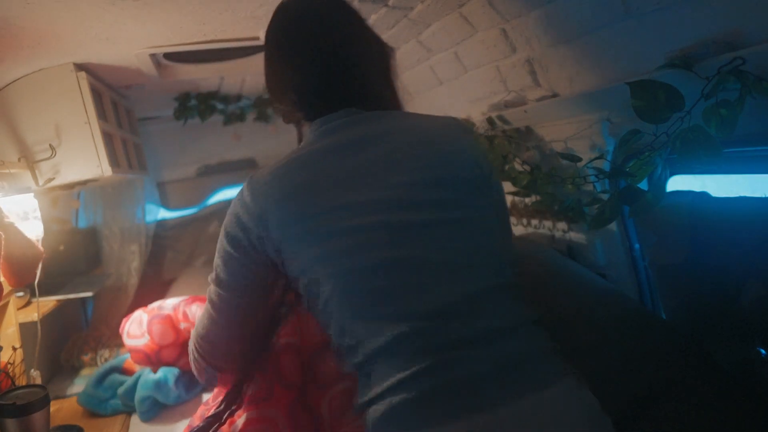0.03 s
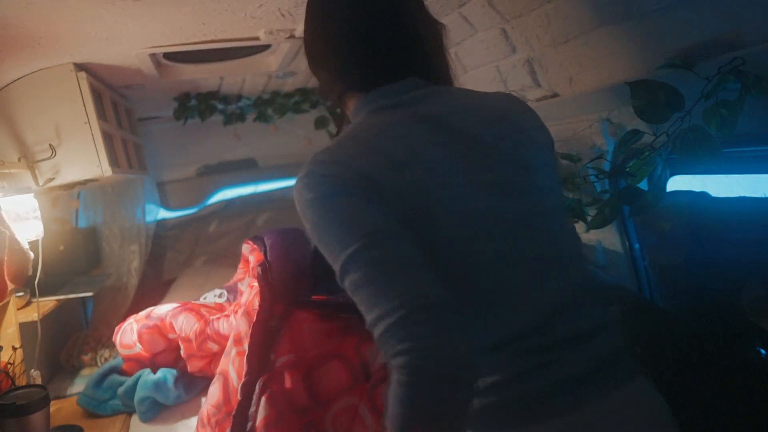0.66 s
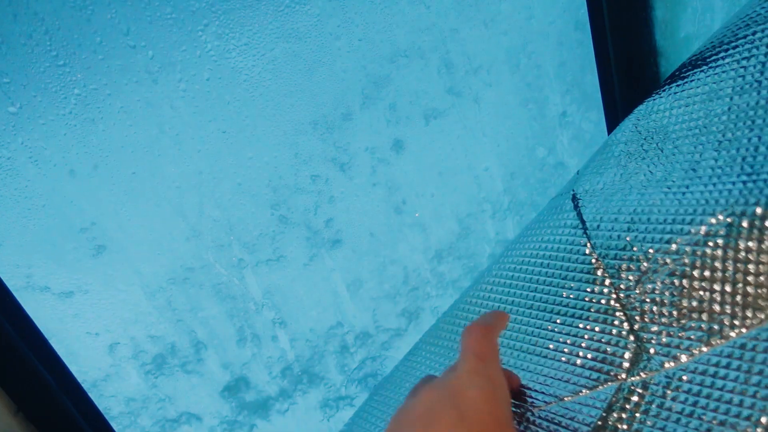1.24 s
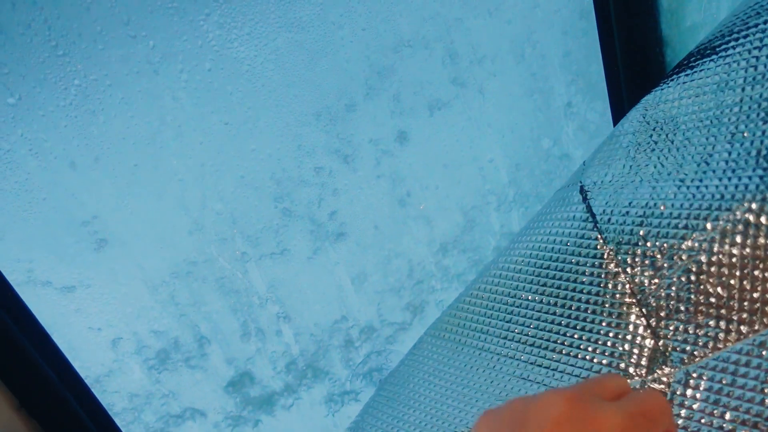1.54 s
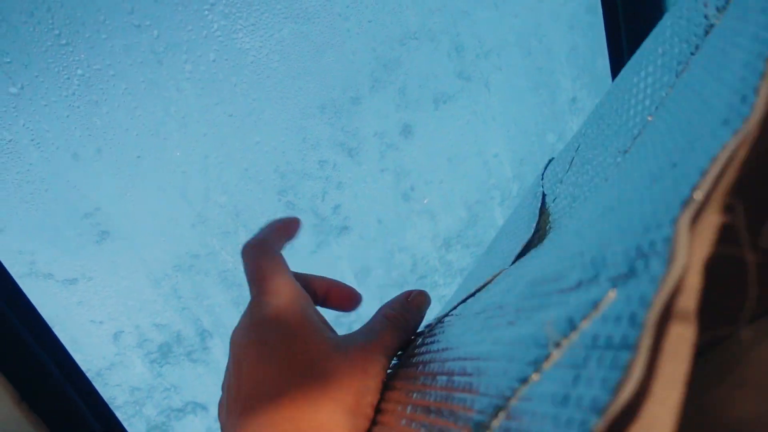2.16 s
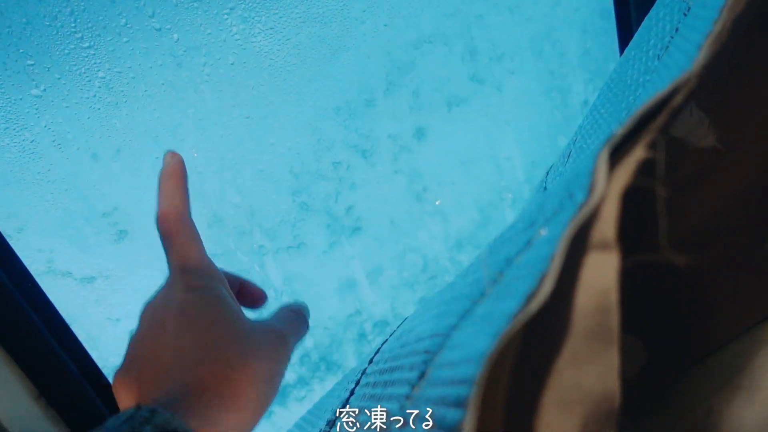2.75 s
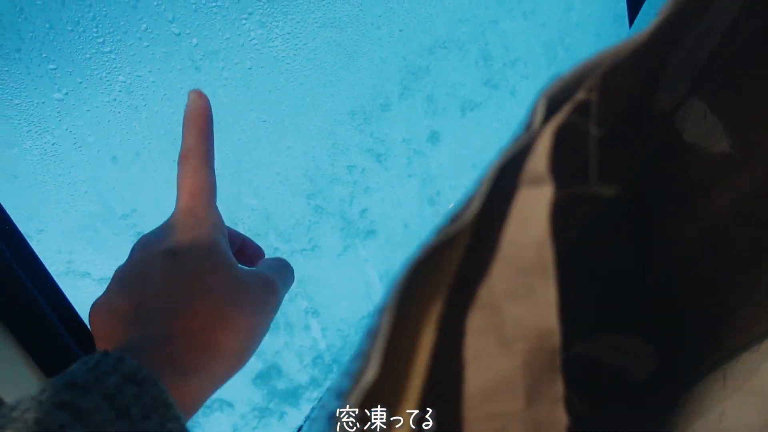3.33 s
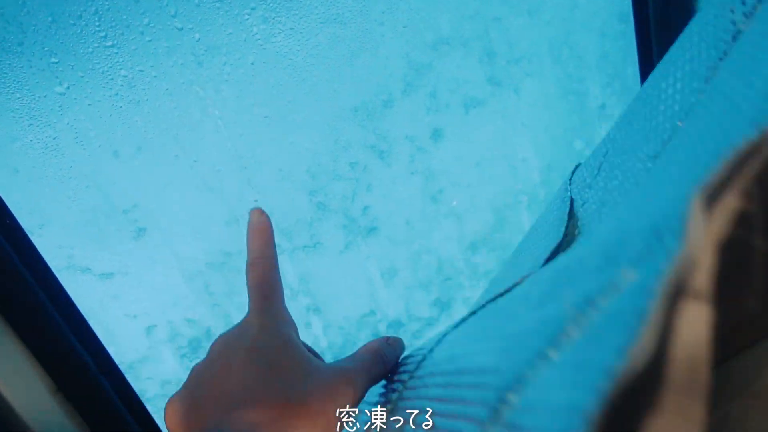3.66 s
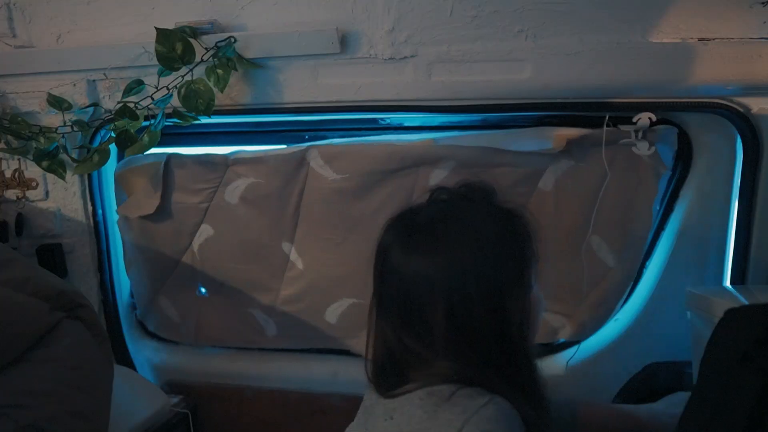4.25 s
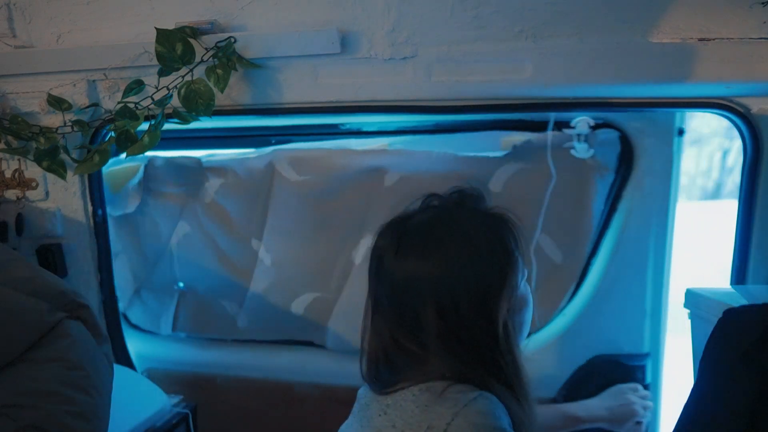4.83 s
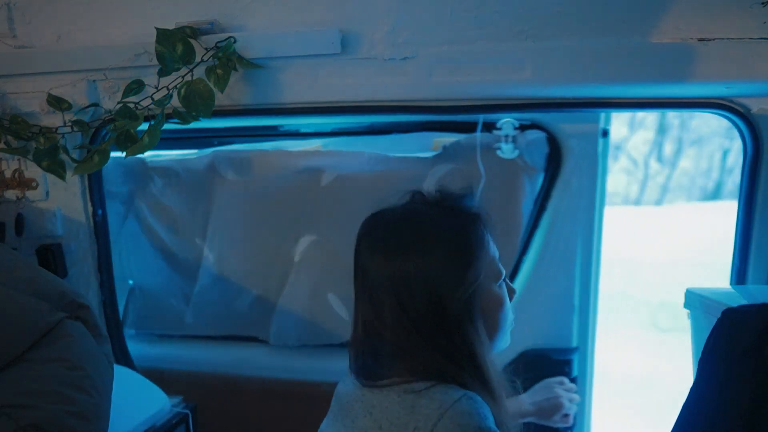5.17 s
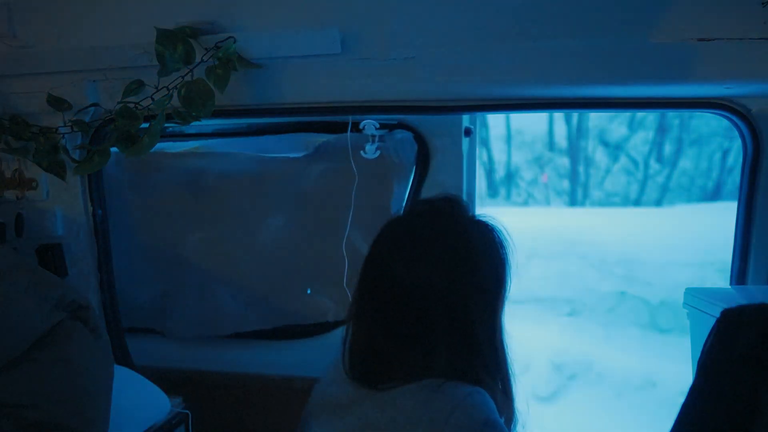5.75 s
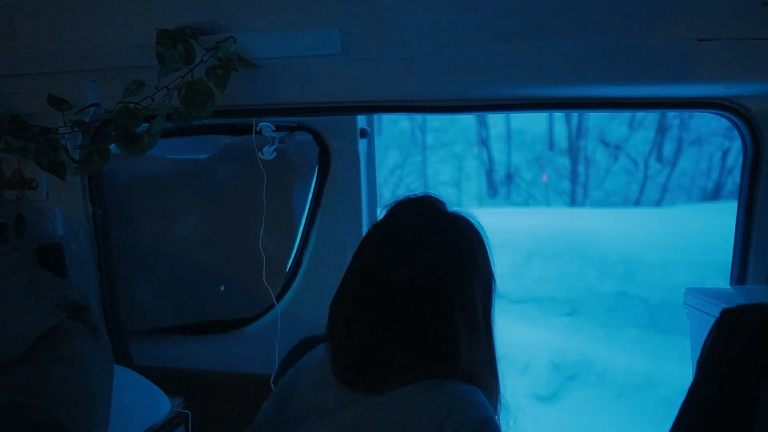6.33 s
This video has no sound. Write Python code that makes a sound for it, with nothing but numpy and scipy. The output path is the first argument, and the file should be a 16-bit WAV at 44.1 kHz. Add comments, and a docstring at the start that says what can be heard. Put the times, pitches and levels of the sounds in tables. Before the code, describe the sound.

A nylon sleeping bag swishes softly, with a few small knocks on a bed frame. A foil sunshade crinkles and snaps as it is peeled back. A fingernail then scrapes frost off a window in short, gritty strokes, cracking off bits of ice. The scraping cuts off and a sliding door rolls open with quick clacks and a low rumble. Everything sounds close, inside a small, quiet van.

```python
"""Inside a parked van on a frozen morning. A nylon sleeping bag swishes aside and the bed frame knocks, then a
foil sunshade crackles as it is peeled back. A fingernail scrapes frost off the side window; then the scene
changes and the sliding door rolls open, clacking, and the whole body rumbles. Every friction sound is a stream
of tiny slips that rings the thing being rubbed; the small cabin adds a short echo."""
import sys
import numpy as np
from scipy import signal
from scipy.fft import rfft, irfft
from scipy.io import wavfile
from scipy.ndimage import uniform_filter1d

SR = 44100
rng = np.random.default_rng(int(sys.argv[2]) if len(sys.argv) > 2 else 0)


def master(y):
    """Save y as 16-bit WAV."""
    cut = np.clip(np.atleast_2d(y).T, -1, 1)
    pcm = np.round(cut * 32767)  # scale
    wavfile.write(sys.argv[1], SR, pcm.astype(np.int16))


N = 286650
TIME = np.arange(N) / SR
FREQ = np.maximum(np.arange(N // 2 + 1) * SR / N, 1)
DOOR_START_S, DOOR_FADE_S = 4.187, 0.0029  # the scene changes: the scraping stops dead and the door begins


def sliding_door():
    """Rollers run along a gritty track and ring the body; the mechanism clacks over a steady hiss."""
    # the door's travel, as faders for its three bands: time_s, roll_db, rumble_db, hiss_db
    travel = [(4.2, -45, -40, -54), (4.33, -48, -45.5, -55.5), (4.55, -50, -33, -53),
              (4.74, -43, -30, -52.5), (4.9, -29.5, -24, -48), (5.13, -27, -25, -43.5),
              (5.28, -23, -25, -40.5), (5.7, -26.5, -24.5, -41), (6.06, -29, -28.5, -44),
              (6.5, -33, -26, -48)]
    # tone of the track: frequency_hz, gain_db
    track = [(15, -14), (55, 5.5), (150, 3.5), (270, -7), (520, -14.5), (1600, -19.5), (2500, -25),
             (4000, -34), (5600, -35), (7200, -44), (9000, -42.5), (16000, -59.5)]
    # resonances of the van's body: pitch_hz, width_hz, boost_db
    panels = [(137, 30, -2), (223, 17, -0.5), (335, 57, 4), (672, 170, 3)]
    # the rollers jolt over joints in the track: start_s, level_db
    joints = [(4.879, -11), (5.078, -7)]
    # the latch lets go, then the mechanism clacks ever faster: start_s, level_db, ring_hz
    latch_hits = [(4.6638, -23, 2640), (4.7516, -34, 2000), (4.8179, -29.5, 2200), (4.8764, -23, 2960),
                  (4.9307, -24, 4330), (4.9804, -26, 8550), (5.029, -24.5, 2310), (5.0764, -31, 2900),
                  (5.1138, -25.5, 3430), (5.1532, -21, 5530)]
    # tone of the mechanism: frequency_hz, gain_db
    latch_tone = [(300, -10), (1400, 4.5), (1900, 4), (4500, -5.5), (9000, -14), (11000, -16), (15500, -22)]
    times, *faders_db = np.transpose(travel)
    moving = np.clip((TIME - DOOR_START_S) / DOOR_FADE_S, 0, 1)
    roll, rumble, hiss = (moving * undb(np.interp(TIME, times, db)) for db in faders_db)
    grit = slips(per_s=2500, spread_db=5, smooth=1) * undb(0.94 * wander(35))
    rolling = stroke(ring(grit, track, panels), (rumble, roll, hiss), bass_hz=246, treble_hz=2035)
    jolts = highpass(ring(bursts(joints, decay_s=0.012), track, panels), hz=390, order=2)
    latch = clacks(latch_hits, latch_tone, decay_s=0.0075, rise_s=0.003, ring_db=8, ring_share=0.2)
    steady_hiss = undb(-58) * moving * rng.standard_normal(N)
    sound = rolling + jolts + latch + steady_hiss
    return panel_hum() + cabin(sound, wet_db=-8.5, t60_s=0.054, wide_db=-2, wide_hz=1510)


def panel_hum():
    """The rollers hold body panels in vibration; each hum sags at both ends with the door's speed."""
    # panels shudder as the door runs: start_s, end_s, pitch_hz, sag_hz, level_db
    hums = [(4.193, 4.31, 38.1, 3, -32.5), (4.718, 4.926, 139, 3, -24), (4.876, 5.001, 215.5, 3, -24.5),
            (4.912, 5.23, 152.4, 7, -25.5), (5.161, 5.652, 335.2, 26, -26.5), (5.22, 5.466, 133.1, 2, -25),
            (5.378, 5.58, 214.7, 2, -27), (5.517, 5.68, 117.2, 3, -28), (6.1, 6.39, 214.5, 2, -27),
            (6.18, 6.65, 141, 3, -27.5)]
    fade_s, arch_db, waver_rad = 0.028, 3.5, 0.34
    out = np.zeros(N)
    for start, end, hz, sag_hz, db in hums:
        off_centre = np.abs(np.interp(TIME, [start, end], [-1, 1]))
        held = np.clip(np.minimum(TIME - start, end - TIME) / fade_s, 0, 1)
        phase = 2 * np.pi * np.cumsum(hz - sag_hz * off_centre ** 2) / SR + waver_rad * wander(18)
        out += held * undb(db - arch_db * off_centre) * unit(np.sin(phase))
    return out


def frost_scrape():
    """The nail sticks and slips over ice crystals, ringing the pane and cracking off brittle grains."""
    # strokes of the nail: start_s, peak_s, end_s, level_db, bass_offset_db, treble_offset_db
    nail = [(2.617, 2.625, 2.696, -48, 3.5, -7.5), (2.755, 2.88, 3.003, -31, -6.5, -15),
            (2.797, 2.9, 2.954, -25.5, -30, -8.5), (3.068, 3.097, 3.14, -35.5, 2.5, -18.5),
            (3.118, 3.22, 3.4, -25, -10, -12.5), (3.185, 3.21, 3.33, -31, 1.5, -27),
            (3.452, 3.62, 3.725, -33.5, -10, -7.5), (3.735, 3.76, 3.82, -33, -3.5, -14),
            (4.079, 4.09, 4.17, -38.5, -4, -9.5), (4.158, 4.172, 4.4, -32.5, 0.5, -3)]
    # tone of the frosted window: frequency_hz, gain_db
    frost = [(70, -53), (115, -17.5), (170, -1), (300, -7), (640, -11.5), (1000, -7), (1780, -10),
             (2300, -18), (5000, -20.5), (8500, -28), (10500, -37), (16000, -50)]
    # resonances of the glass: pitch_hz, width_hz, boost_db
    pane = [(180, 38, 0.5), (431, 72, 9), (513, 11, 6), (858, 84, 9.5), (1278, 61, 9), (1600, 80, -2),
            (2890, 125, 9.5), (3215, 110, 9.5), (3560, 70, -2), (4620, 130, 1.5), (5330, 150, 4)]
    # the nail catches and a larger chip breaks off: start_s, level_db
    catches = [(2.7128, -26), (2.7245, -27.5), (2.7545, -26), (2.7782, -24.5), (2.7971, -17), (2.8125, -16),
               (2.8458, -26), (2.8595, -14), (2.867, -13.5), (2.8912, -17.5), (2.905, -22), (2.9223, -13.5),
               (2.934, -13), (3.1195, -21), (3.1937, -20), (3.226, -20), (3.5025, -28), (3.5484, -20.5),
               (3.6407, -25), (3.6527, -15), (3.7475, -20.5), (4.127, -30), (4.1664, -14.5)]
    # the nail skids hard on bare glass: peak_s, pitch_hz, width_hz, level_db, length_s
    skid = [(4.177, 1560, 1080, -24.5, 0.009)]
    release = stick_slip(per_s=105, depth_db=15, curve=0.68)
    grit = slips(per_s=3000, spread_db=1, smooth=0.46) * release * undb(wander(170))
    age = TIME[:SR // 50]
    grain = rng.standard_normal(len(age)) * np.exp(-age / 0.0022)
    crystals = signal.oaconvolve(slips(per_s=300, spread_db=1.5, smooth=0.1) * release, grain)[:N]
    bass, middle, treble = gestures(nail, arch_db=7, attack_s=0.0032, release_s=0.011,
                                    linger_db=-23, linger_s=0.15)
    scrape = stroke(ring(grit, frost, pane), (bass, middle, treble), bass_hz=330, treble_hz=2230)
    crackle = undb(-2.5) * treble * unit(highpass(ring(crystals, frost), hz=2170, order=3))
    # chips are too light to flex the glass much
    chips = highpass(ring(bursts(catches, decay_s=0.006), frost, pane), hz=790, order=1)
    scrape_cutoff = np.clip(1 + (DOOR_START_S - TIME) / DOOR_FADE_S, 0, 1)
    sound = scrape_cutoff * (scrape + crackle + chips + swells(skid))
    return cabin(sound, wet_db=-4.5, t60_s=0.044, wide_db=-6.5, wide_hz=2520)


def sunshade():
    """Quilted foil crackles as it bends; creases snap and the padding thuds under the hand."""
    # the shade is bent or brushed: start_s, peak_s, end_s, level_db, bass_offset_db, treble_offset_db
    bends = [(1.29, 1.35, 1.47, -57.5, -8.5, 3), (1.485, 1.52, 1.637, -50.5, 1.5, 4),
             (1.585, 1.645, 1.704, -40.5, -1.5, 0.5), (1.72, 1.8, 1.82, -56, -12, 6.5),
             (1.885, 1.945, 1.99, -52.5, 4.5, 4.5), (1.975, 2.03, 2.091, -42.5, -8, 1),
             (2.12, 2.19, 2.25, -51, -11, 2.5), (3.78, 3.83, 3.92, -61, 4, 4.5)]
    # tone of the foil: frequency_hz, gain_db
    foil = [(50, -39), (150, 7.5), (450, 6.5), (720, -2), (1350, 0.5), (2300, -5), (3900, -7), (5400, -8),
            (7000, -8.5), (12000, -16.5), (16000, -27)]
    # the sheet resounds as it buckles: peak_s, pitch_hz, width_hz, level_db, length_s
    buckles = [(1.225, 1280, 180, -48.5, 0.031), (1.63, 420, 253, -37, 0.033),
               (1.642, 1220, 433, -30.5, 0.018), (2.0, 5450, 900, -44, 0.028)]
    # the sharpest creases snap: start_s, level_db, ring_hz
    creases = [(1.199, -31, 4960), (1.3836, -41, 7000), (1.4719, -32, 7160), (1.5029, -33, 5030),
               (1.5957, -30, 5370), (1.7962, -35, 5100), (1.9174, -31.5, 5030), (1.9703, -25, 5450),
               (1.9803, -24, 5500), (2.0382, -26.5, 6760), (2.1928, -30.5, 3660), (2.2033, -29, 10600),
               (2.2445, -34, 9050)]
    # tone of a snap: frequency_hz, gain_db
    snap_tone = [(400, -1), (1400, -3), (5500, 3), (15000, -1)]
    # the hand bumps the shade: start_s, level_db
    bumps = [(1.67, -28), (2.041, -27.5)]
    # dull tone of the padding: frequency_hz, gain_db
    padding = [(40, -27), (160, -0.5), (260, -6), (450, -9), (1000, -48)]
    grit = slips(per_s=6000, spread_db=5, smooth=1.34) * stick_slip(per_s=80, depth_db=10, curve=0.83)
    gains = gestures(bends, arch_db=4, attack_s=0.024, release_s=0.018, linger_db=-9.5, linger_s=0.13)
    crinkle = stroke(ring(grit, foil), gains, bass_hz=590, treble_hz=3240)
    snaps = clacks(creases, snap_tone, decay_s=0.0026, rise_s=0.00027, ring_db=7.5, ring_share=0.34)
    sound = crinkle + swells(buckles) + snaps + ring(bursts(bumps, decay_s=0.0069), padding)
    return cabin(sound, wet_db=-11, t60_s=0.1, wide_db=-6.5, wide_hz=1800)


def sleeping_bag():
    """Nylon slides over nylon in a fine hiss, sings where it is taut, and the bed frame knocks."""
    # pushes on the bag: start_s, peak_s, end_s, level_db, bass_offset_db, treble_offset_db
    pushes = [(-.02, .14, 0.78, -47.5, -5, -3.5), (.32, .39, 0.48, -42.5, -6, 1.5),
              (.42, .53, 0.66, -42, -16, -2), (.78, .82, 0.89, -52.5, -5, -8),
              (.91, .98, 1.074, -40.5, -10, -3), (1.08, 1.2, 1.265, -47, -9.5, -2)]
    # tone of the nylon: frequency_hz, gain_db
    nylon = [(20, -11), (60, -2.5), (210, -3), (430, -7.5), (700, -0.5), (1800, 1), (3500, -7.5),
             (10000, -15), (16000, -21)]
    # the taut weave sings as it slides: peak_s, pitch_hz, width_hz, level_db, length_s
    weave = [(.52, 730, 400, -43.5, 0.063), (1.02, 850, 300, -44, 0.064)]
    # small knocks on the bed frame: start_s, level_db
    knocks = [(.056, -41.5), (.104, -39), (.751, -32.5), (.786, -39), (.873, -26), (.902, -33),
              (1.181, -38.5)]
    # tone of the frame: frequency_hz, gain_db
    frame = [(70, -17), (200, 5), (430, -11.5), (750, 3), (4800, -7), (6500, -15.5), (16000, -19)]
    friction = slips(per_s=6000, spread_db=4.5, smooth=1.07) * undb(1.2 * wander(59.84))
    gains = gestures(pushes, arch_db=7, attack_s=0.0093, release_s=0.026, linger_db=-15, linger_s=0.12)
    swish = stroke(ring(friction, nylon), gains, bass_hz=420, treble_hz=3260)
    sound = swish + swells(weave) + ring(bursts(knocks, decay_s=0.011), frame)
    return cabin(sound, wet_db=-6, t60_s=0.038, wide_db=-0.5, wide_hz=1190)


def still_air():
    """A faint hush with a low drone fills the van."""
    # tone of the hush: frequency_hz, gain_db
    room_tone = [(30, -36), (180, 3), (7000, -17), (16000, -36)]
    hush = ring(rng.standard_normal(N), room_tone)
    band = signal.butter(2, [56, 80], "band", fs=SR, output="sos")
    drone = unit(signal.sosfilt(band, rng.standard_normal(N)))
    return cabin(undb(-68) * (hush + drone), wet_db=-36, t60_s=0.17, wide_db=8.5, wide_hz=686)


def cabin(x, wet_db, t60_s, wide_db, wide_hz):
    """Short reflections off the near walls; the treble spreads wide, the deep bass stays centred."""
    age = TIME[:SR // 4]
    tails = rng.standard_normal((2, len(age))) * np.exp(-np.log(1000) * age / t60_s) * (age > 0.001)
    paths = (signal.oaconvolve(x, tail / np.sqrt(np.sum(tail ** 2)))[:N] for tail in tails)
    # the source moves about, so the phase of the reflections keeps changing
    echo, side = (np.real(signal.hilbert(path) * np.exp(2j * wander(10))) for path in paths)
    mid = (x + undb(wet_db) * echo) / np.hypot(1, undb(wet_db))
    width = FREQ / (FREQ + wide_hz) / (1 + (150 / FREQ) ** 4)
    side = undb(wide_db) * irfft(rfft(side) * width, N)
    return np.array([mid + side, mid - side])


def slips(per_s, spread_db, smooth):
    """Friction: tiny clicks of uneven size over a share of smooth sliding noise."""
    size = undb(spread_db * np.minimum(rng.exponential(size=N), 3))
    clicks = (rng.random(N) < per_s / SR) * size * rng.choice([-1, 1], N)
    return unit(unit(clicks) + smooth * rng.standard_normal(N))


def stick_slip(per_s, depth_db, curve):
    """Tension lets go at uneven intervals: each release starts sharply and fades until the next."""
    cycles = np.cumsum(per_s * np.exp(0.5 * wander(per_s))) / SR
    return unit(undb(-depth_db * (cycles % 1) ** curve))


def gestures(rows, arch_db, attack_s, release_s, linger_db, linger_s):
    """Bass, middle and treble envelopes of hand moves: each grips, arches to a peak, lets go, lingers."""
    bass_follow, treble_follow = 0.98, 0.89  # dB gained for each dB of effort
    t = TIME[::32]
    power = np.zeros((3, len(t)))
    for start, peak, end, level_db, bass_db, treble_db in rows:
        arch = undb(-arch_db * np.interp(t, [start, peak, end], [1, 0, 1]))
        grip = np.clip((t - start) / attack_s, 0, 1)
        after = np.maximum(t - end, 0)
        tail = np.maximum(np.exp(-after / release_s), undb(linger_db) * np.exp(-after / linger_s))
        effort = grip * arch * tail
        bass = undb(bass_db) * effort ** bass_follow
        treble = undb(treble_db) * effort ** treble_follow
        power += (undb(level_db) * np.array([bass, effort, treble])) ** 2
    return [np.interp(TIME, t, np.sqrt(band)) for band in power]


def stroke(x, gains, bass_hz, treble_hz):
    """Ride a friction sound in three bands: the bass gain stands for pressure, the treble for speed."""
    bass = 1 / (1 + (FREQ / bass_hz) ** 6)
    treble = 1 / (1 + (treble_hz / FREQ) ** 6)
    bands = (bass, 1 - bass - treble, treble)
    spectrum = rfft(x)
    return sum(unit(irfft(spectrum * band, N)) * gain for band, gain in zip(bands, gains))


def bursts(events, decay_s, rise_s=0.00044):
    """Each contact is a sudden flurry of micro-impacts that dies away."""
    power = np.zeros(N)
    for start, db in events:
        first = int(start * SR)
        age = TIME[:min(N - first, SR // 4)]
        envelope = undb(db) * (1 - np.exp(-age / rise_s)) * np.exp(-age / decay_s)
        power[first:first + len(age)] += envelope ** 2
    return np.sqrt(power) * rng.choice([-1, 1], N)


def clacks(rows, tone, decay_s, rise_s, ring_db, ring_share):
    """Contacts on one object; each wakes the resonance of its spot, ring_share of its pitch wide."""
    out = np.zeros(N)
    for start, db, hz in rows:
        hit = bursts([(start, db)], decay_s, rise_s)
        out += ring(hit, tone, [(hz, hz * ring_share, ring_db)], size=2048)
    return out


def swells(rows):
    """A single resonance is rubbed into life for a moment and sinks back."""
    out = np.zeros(N)
    for peak, hz, width, db, length in rows:
        band = signal.butter(2, [hz - width / 2, hz + width / 2], "band", fs=SR, output="sos")
        shape = np.exp(-np.minimum(((TIME - peak) / length) ** 2, 20))
        song = signal.sosfilt(band, rng.standard_normal(N)) * shape
        out += undb(db) * song * np.sqrt(np.sum(shape ** 2) / np.sum(song ** 2))
    return out


def ring(x, tone, modes=(), size=16384):
    """Play x through a body with a broad tone and resonances on top; white noise keeps its power."""
    f = np.maximum(np.arange(size // 2 + 1) * SR / size, 1)
    hz, db = np.transpose(tone)
    boost = sum(undb(boost_db) ** 2 / (1 + ((f ** 2 - pitch ** 2) / (f * width)) ** 2)
                for pitch, width, boost_db in modes)
    gain = undb(np.interp(np.log(f), np.log(hz), db)) * np.sqrt(1 + boost)
    # minimum phase: the body rings only after it is struck
    cepstrum = irfft(np.log(unit(gain)))[:size // 2]
    cepstrum[1:] *= 2
    impulse = irfft(np.exp(rfft(cepstrum, size)))
    return signal.oaconvolve(x, impulse)[:N]


def wander(per_s):
    """A random drift that glides to a new value per_s times a second; rms near 1."""
    hold = max(int(SR / per_s), 1)
    steps = np.repeat(rng.uniform(-1, 1, N // hold + 1), hold)
    return unit(uniform_filter1d(steps, hold))[:N]


def highpass(x, hz, order):
    """Take out the lows."""
    return signal.sosfilt(signal.butter(order, hz, "high", fs=SR, output="sos"), x)


def undb(db):
    """Decibels to gain."""
    return 10 ** (np.asarray(db) / 20)


def unit(x):
    """Scale to rms 1."""
    return x / np.sqrt(np.mean(x ** 2))


def scene():
    """The four actions follow one another over the still air."""
    return sleeping_bag() + sunshade() + frost_scrape() + sliding_door() + still_air()


def record(dry):
    """A steep high cut at 16 kHz."""
    return signal.sosfilt(signal.ellip(10, 0.2, 80, 16000, fs=SR, output="sos"), dry)


dry = scene()
out = record(dry)
master(out)
```